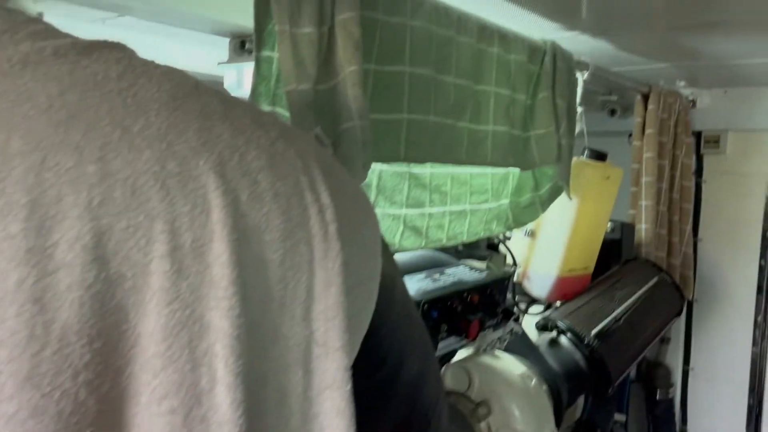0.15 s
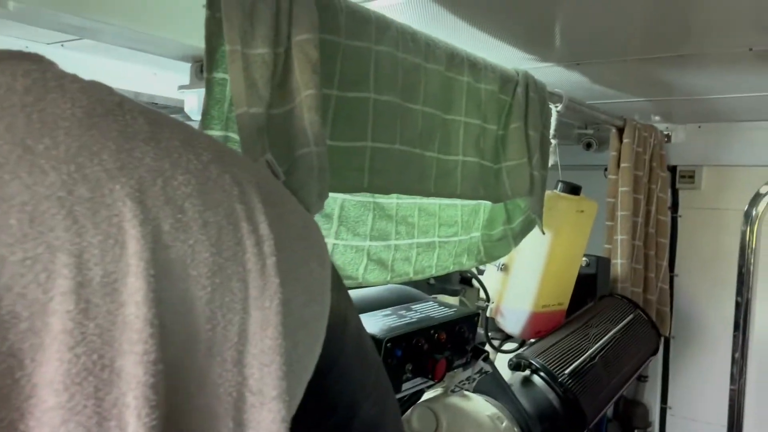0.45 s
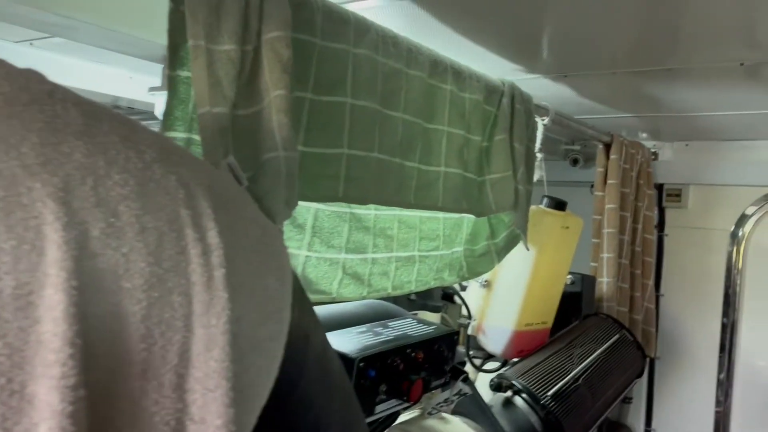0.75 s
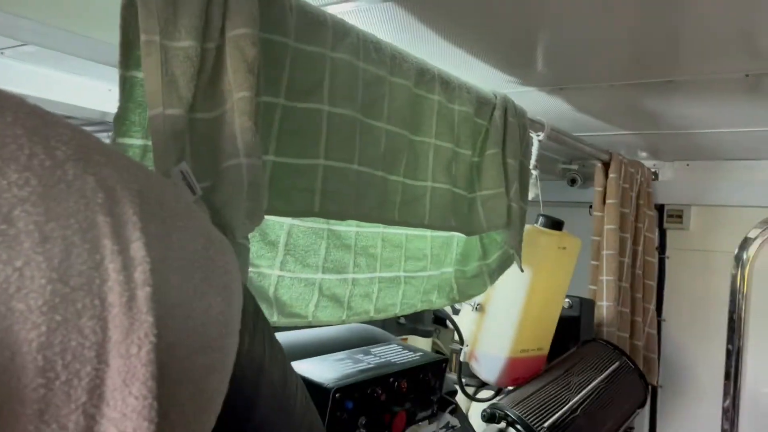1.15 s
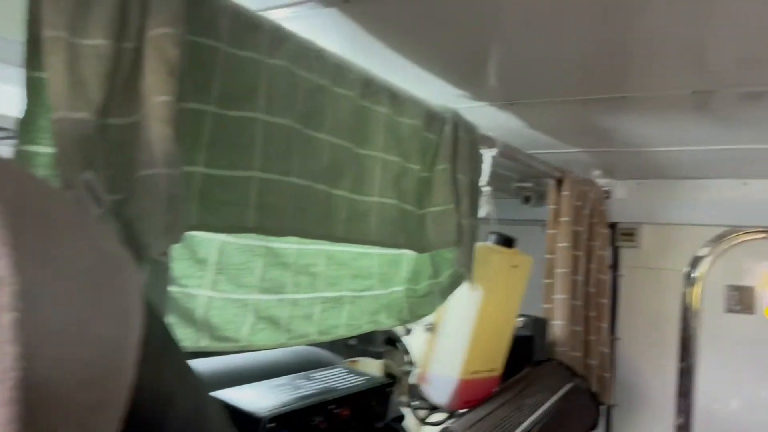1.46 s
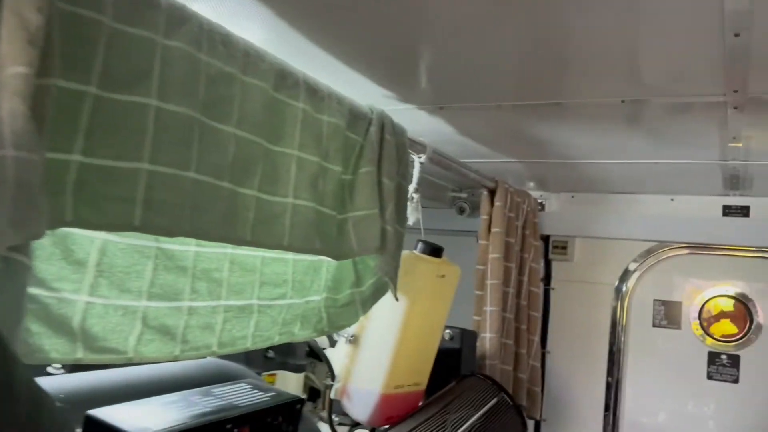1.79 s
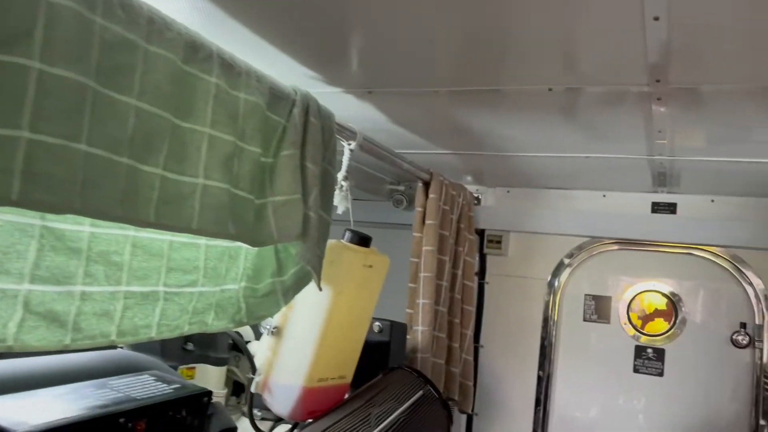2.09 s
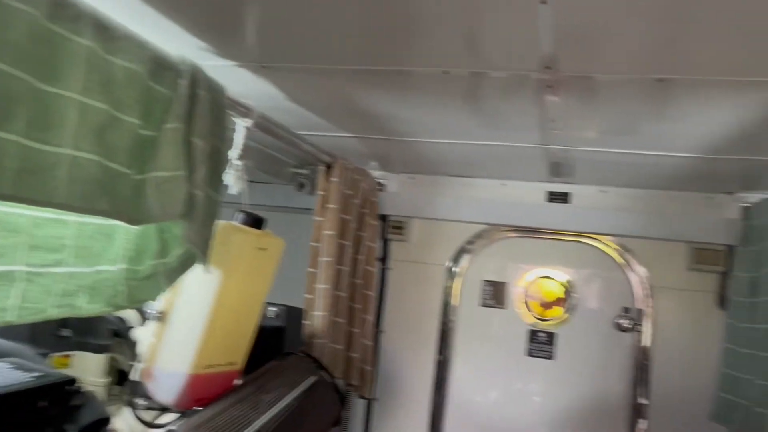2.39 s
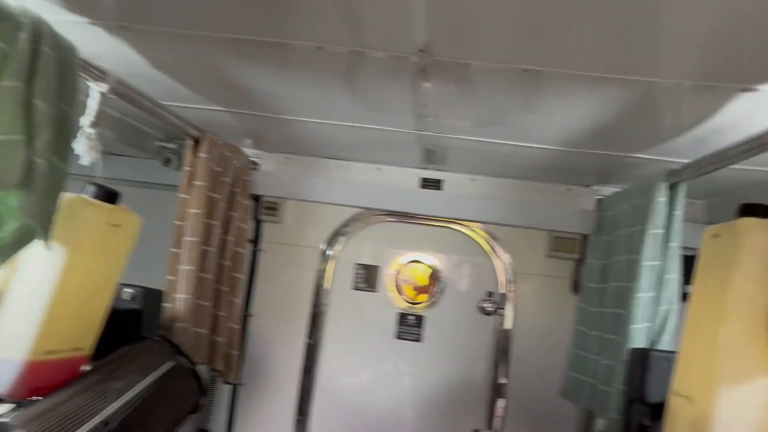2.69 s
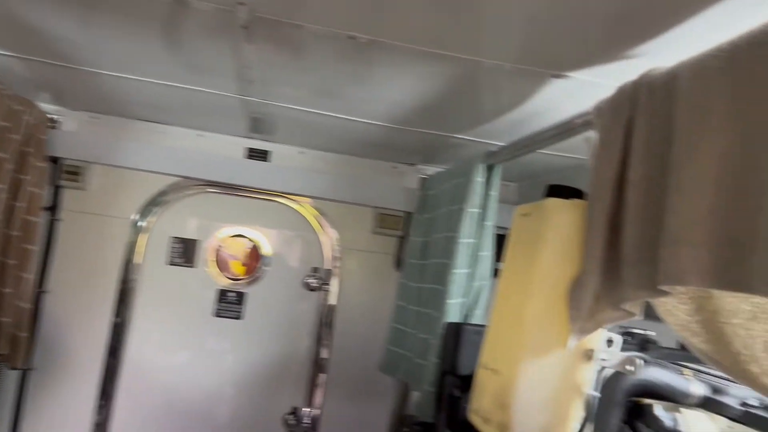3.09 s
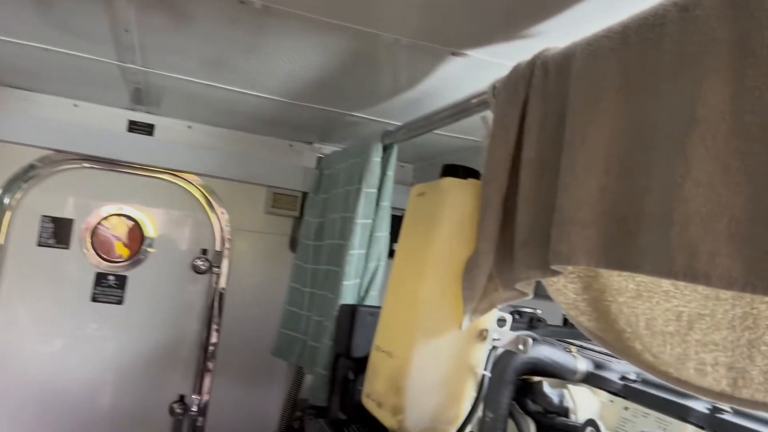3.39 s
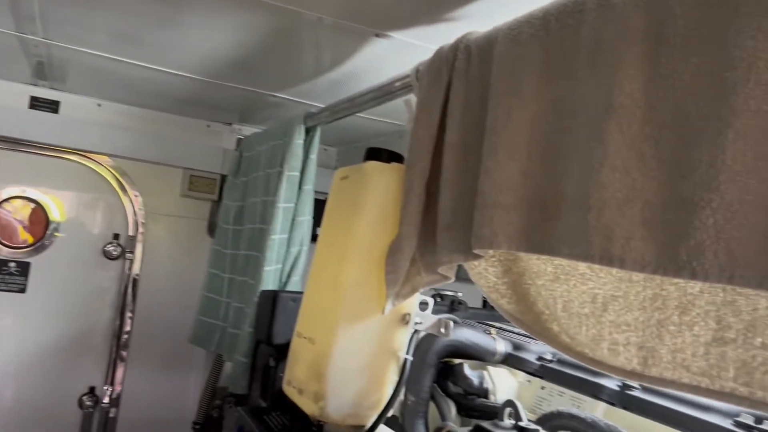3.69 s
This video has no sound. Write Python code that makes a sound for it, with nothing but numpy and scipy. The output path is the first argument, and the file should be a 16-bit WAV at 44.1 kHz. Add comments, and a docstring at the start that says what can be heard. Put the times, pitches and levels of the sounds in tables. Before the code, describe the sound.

A diesel engine drones with a loud, steady low hum inside a small metal cabin

```python
"""Diesel generator in a boat cabin

Inside a steel hull, two microphones turn with a handheld camera as it pans round from left to right.
A four-cylinder diesel drones: even firings and one stronger cylinder make a sum of engine orders.
Behind it lie low hull noise, a roar of partly repeating machinery noise and three cabin resonances.
Thin wavering tones lie on top: engine and gear tones below 2 kHz, electronic whines above.
A small pump ticks to the left as noise puffs in ringing metal, and once a soft bump shudders through
as two decaying low tones with two rough rubs."""
import sys
import numpy as np
from scipy import signal
from scipy.fft import rfft, irfft
from scipy.io import wavfile
from scipy.ndimage import uniform_filter1d

SR = 44100
rng = np.random.default_rng(int(sys.argv[2]) if len(sys.argv) > 2 else 0)


def to_wav(s):
    """Save 16-bit WAV."""
    ch = np.atleast_2d(s).T  # columns
    pcm = np.round(np.clip(ch, -1, 1) * 32767)  # PCM
    wavfile.write(sys.argv[1], SR, pcm.astype(np.int16))


N = 169785
CYCLE_HZ = 15.0252  # four-stroke cycles a second


def gain_of(db):
    """Turns dB into an amplitude gain."""
    return 10 ** (np.asarray(db) / 20)


def evened(x):
    """Scales to rms 1."""
    return x / np.sqrt(np.mean(x ** 2) + 1e-20)


def read(points, hz):
    """Reads a table over frequency, straight between points on a log-frequency axis."""
    f, value = np.transpose(list(points))
    return np.interp(np.log(hz + 1), np.log(f + 1), value)


def drift(per_s):
    """Slow random wandering of rms 1: twelve sines up to per_s Hz, the slower ones stronger."""
    t = np.arange(0, N + 441, 441) / SR
    slow = 0
    for f in np.geomspace(.1, 1, num=12):
        slow = slow + np.sin(2 * np.pi * (f * per_s * t + rng.random())) / np.sqrt(f)
    return np.interp(np.arange(N) / SR, t, evened(slow))


def ring(x, hz, width_hz):
    """A two-pole resonance of gain 1 at its peak."""
    return signal.lfilter(*signal.iirpeak(hz, hz / width_hz, SR), x)


# Low hull noise: f/Hz, level/dB per Hz
RUMBLE = [(20, -79), (35, -80), (55, -60), (85, -63), (120, -64), (200, -66.5), (260, -71.5), (330, -77),
          (420, -106), (600, -150)]


def rumble():
    """Low noise of the hull: shaped random noise, the same in both microphones."""
    hz = np.fft.rfftfreq(N, 1 / SR)
    shape = gain_of(read(RUMBLE, hz)) * np.sqrt(SR / 2)
    return irfft(rfft(rng.standard_normal(N)) * shape, N)


# Clatter repeating with the engine cycle: f/Hz, share that repeats (0-1, before the gain below),
# likeness of one cycle to the next (0-1)
REPEAT = [(350, .15, .9), (600, .4, .88), (850, .5, .83), (1200, .4, .75), (1700, .45, .65),
          (2400, .22, .6), (3300, .07, .6), (5000, 0., .6)]


def clatter(count, gain=1):
    """Noise of valves and pistons: part of it comes round again each cycle and changes slowly."""
    hz = np.fft.rfftfreq(N, 1 / SR)
    f, share, alike = np.transpose(REPEAT)
    share = np.clip(gain * read(zip(f, share), hz), 0, .95)
    alike = read(zip(f, alike), hz)
    # repeating gathers the noise's power at multiples of the cycle rate
    comb = (1 - alike ** 2) / (1 - 2 * alike * np.cos(2 * np.pi * hz / CYCLE_HZ) + alike ** 2)
    power = 1 - share + share * comb
    return irfft(rfft(rng.standard_normal((count, N))) * np.sqrt(power), N)


# Roar common to both microphones, early and late in the pan: f/Hz, level/dB re COMMON_REF_DB
COMMON_EARLY = [(180, -31), (300, 1), (428, -9.5), (495, -3), (536, -11), (600, 1), (651, -18), (717, 0),
                (765, -15.5), (816, -7), (959, -9.5), (1040, -12), (1440, -15.5), (1530, -17.5),
                (1800, -16.5), (2050, -18), (3720, -24), (4030, -23), (5570, -28.5), (6030, -28),
                (7560, -37), (8600, -77), (9330, -38), (12100, -37), (14200, -46.5)]
COMMON_LATE = [(180, -28), (300, 0), (330, -9.5), (370, -25.5), (388, -8), (408, -6.5), (471, -8.5),
               (563, -5.5), (591, -18.5), (729, -9.5), (856, -15), (974, -11), (1390, -17.5), (1660, -17.5),
               (1860, -19), (2570, -19.5), (3110, -24), (3600, -23.5), (5660, -31.5), (6130, -29.5),
               (7560, -41), (8470, -79), (9330, -40), (11900, -39), (14200, -48.5)]
# Roar opposite in the two microphones, early and late: f/Hz, level/dB re WIDE_REF_DB
WIDE_EARLY = [(88, -33), (150, -10), (228, -10), (256, -23), (298, -41), (389, -27), (498, -1.5), (650, -8),
              (816, -8), (1360, -15.5), (1590, -15.5), (1850, -16.5), (2040, -18), (5170, -30.5),
              (6020, -31.5), (9880, -35.5), (10900, -47), (11500, -80), (14200, -40.5)]
WIDE_LATE = [(88, -34), (150, 1), (188, 9.5), (207, -16), (232, 4), (266, -14), (303, -4), (327, -23),
             (404, -23), (470, -11.5), (662, -12), (915, -9), (1190, -16.5), (1450, -17), (5080, -31),
             (6020, -33), (10500, -38), (11500, -71.5), (14200, -43)]
# Stronger at the left microphone: f/Hz, lean to the left (-1..1)
LEAN = [(300, -0.092), (670, -0.27), (1230, -0.22), (2250, 0.33), (4110, 0.65), (7000, 0.38), (9000, 0.)]
# Earlier at the left microphone: f/Hz, how far left leads right (-1..1)
AHEAD = [(200, .3), (500, .6), (1200, .5), (2500, .4), (4300, .4), (5300, 0.), (6200, -.5), (7300, -.5),
         (9000, 0.)]
# Roar over time: t/s, mids level/dB, treble level/dB
ROAR_LEVELS = [(0, 0.5, 2., ), (.3, -0.5, 2.5), (.7, 0, 0.5), (1.2, -0.5, 0.5), (1.7, 0, 0),
               (2.2, 0.5, 0.5), (2.7, 1.5, 1), (3.199, 1, 1), (3.85, 0.5, 2)]
COMMON_REF_DB, WIDE_REF_DB = (-64.5, -65.5), (-64, -65.5)  # early, late
TURN_S = (0.88, 2.67)  # the colour changes between these moments
PATCH_DB = .9  # rms unevenness over time and frequency
THROB_DB, THROB_ORDER = .45, 6  # swing up and down, swings per engine cycle


def roar():
    """Machinery noise: patchy spectra, common and differing parts, throbbing slightly with the crank."""
    z = signal.stft(clatter(count=2), nperseg=1024, noverlap=768)[2]
    first, second = z / np.sqrt(2 * np.mean(abs(z) ** 2))
    frames, hz = z.shape[2], np.fft.rfftfreq(1024, 1 / SR)
    t = np.arange(frames) * 256 / SR

    patches = rng.standard_normal((frames, 513)).T
    patches = uniform_filter1d(patches, size=6, axis=0)  # across frequency
    patches = evened(uniform_filter1d(patches, size=40, axis=1))  # across time

    times, mids_db, treble_db = np.transpose(ROAR_LEVELS)
    treble = np.clip(np.log2(hz / 1500 + 1e-9) / 2, 0, 1)  # mids hand over from 1.5 to 6 kHz
    level = np.outer(1 - treble, np.interp(t, times, mids_db))
    level += np.outer(treble, np.interp(t, times, treble_db)) + PATCH_DB * patches

    late = np.clip((t - TURN_S[0]) / (TURN_S[1] - TURN_S[0]), 0, 1)

    def colour(start, end, ref_db):
        """Crossfades two spectra in dB as the camera turns."""
        return np.outer(read(start, hz) + ref_db[0], 1 - late) + np.outer(read(end, hz) + ref_db[1], late)

    common = first * gain_of(colour(COMMON_EARLY, COMMON_LATE, COMMON_REF_DB) + level)
    common = common * (hz > 320)[:, None]
    # the part of the wide noise tied to the common one sets the lean and lead between microphones
    tied = (read(LEAN, hz) + 1j * read(AHEAD, hz))[:, None]
    wide = tied * first + np.sqrt(1 - abs(tied) ** 2) * second
    wide = wide * gain_of(colour(WIDE_EARLY, WIDE_LATE, WIDE_REF_DB) + level)
    wide = wide * (hz > 140)[:, None]

    pair = np.array([common + wide, common - wide])
    noise = signal.istft(pair, nperseg=1024, noverlap=768)[1][:, :N] * np.sqrt(SR / 1024)
    cycles = CYCLE_HZ * np.arange(N) / SR
    return noise * gain_of(THROB_DB * np.cos(2 * np.pi * THROB_ORDER * cycles - 1.1))


# Swell of three cabin resonances as the camera turns: t/s, low level/dB, middle level/dB, high level/dB
BANDS = [(0, -50, -72, -68), (.1, -51, -72, -60), (.25, -46, -74, -50), (.4, -63.5, -70, -70),
         (.7, -60, -73, -69), (.95, -53, -73, -70), (1.4, -53, -69, -76), (1.6, -62, -58.5, -74),
         (1.9, -67, -67.5, -75), (2.3, -60, -59, -76), (2.8, -71, -57, -76), (3.1, -58, -60.5, -75),
         (3.85, -62, -63, -74)]
# The resonances, low to high: f/Hz, width/Hz of each of two passes
BAND_RINGS = [(955, 75), (1695, 55), (1755, 45)]
BAND_REPEAT_GAIN = 1.6  # the resonances are fed mostly by repeating strokes


def cabin():
    """Machinery noise ringing in three narrow resonances of the cabin."""
    t = np.arange(N) / SR
    times, *levels_db = np.transpose(BANDS)
    noise = clatter(count=3, gain=BAND_REPEAT_GAIN)
    near = noise[0] + .6 * noise[1:]  # shared part plus each microphone's own
    out = np.zeros((2, N))
    for (hz, width), db in zip(BAND_RINGS, levels_db):
        rung = ring(ring(near, hz, width), hz, width)
        out += gain_of(np.interp(t, times, db)) * evened(rung)
    return out


# Moments when the camera faces left, ahead, right (the engine uses them too): t/s
FACING_S = [0.31, 1.9, 3.26]
# Engine and gear tones below 2 kHz, electronic whines above: f/Hz
TONES_HZ = [500, 586.5, 902, 947, 1685, 1924, 3982, 4059, 4107, 4184, 4684, 4786, 5841, 5893, 5944, 5997,
            6050, 6099, 6153, 6256, 11683, 11892, 11994, 12204]
# One row per tone: rms level/dB facing left, ahead, right
TONES_DB = [(-58.5, -61.5, -61), (-58.5, -67, -70.5), (-65, -66, -60.5), (-58, -62, -64), (-72, -66, -65),
            (-68, -74, -74), (-74, -75.5, -79.5), (-72.5, -78, -80), (-70, -78, -72), (-75.5, -77.5, -73),
            (-73.5, -77, -80), (-69.5, -75.5, -75.5), (-78, -82, -80), (-79, -84, -80),
            (-70.5, -71.5, -71.5), (-70, -71.5, -71.5), (-78.5, -81.5, -80), (-78, -77, -75.5),
            (-77.5, -83, -80), (-67.5, -75, -76), (-88, -87, -87), (-87.5, -89.5, -88), (-80, -80, -81.5),
            (-86, -87.5, -87)]
TONE_WAVER_DB = 2.  # rms of each microphone's own wavering; half as much is shared
TONE_WIDTH_HZ = 2.  # rms pitch wandering from 4 kHz up, in proportion to pitch below


def thin_tones():
    """Engine and gear tones below 2 kHz and electronic whines above: thin wavering tones,
    swelling apart at each microphone; the highest arrive alike at both."""
    t, out = np.arange(N) / SR, np.zeros((2, N))
    for hz, facing_db in zip(TONES_HZ, TONES_DB):
        wander_hz = TONE_WIDTH_HZ * min(hz / 4000, 1) * drift(2.977)
        turns = hz * t + np.cumsum(wander_hz) / SR
        left, right, phase = (hz < 9000) * np.array([drift(2.6), drift(2.2), drift(1.42)])
        waver_db = TONE_WAVER_DB * (np.array([left, right]) + .5 * drift(1.7))
        level = gain_of(np.interp(t, FACING_S, facing_db) + waver_db)
        apart = 0.14 * np.outer([1, -1], phase)  # turns
        out += np.sqrt(2) * level * np.cos(2 * np.pi * (turns + apart))
    return out


# Ringing of the pump's metal housing: f/Hz, overall width/Hz, level/dB
TICK_RINGS = [(4184, 330, 0.5), (4400, 260, -4), (4750, 270, -2.5), (5370, 250, -7)]
TICK_HZ, TICK_START_S = 19.262, .039
TICK_DB, TICK_SPREAD_DB = -66, 1  # rms level before panning, rms unevenness
TICK_PAN_DB = 7.5  # left above right


def pump():
    """A regular tick of uneven strength: noise puffs ring a small metal housing to the left."""
    at = np.round(np.arange(TICK_START_S, N / SR - .01, 1 / TICK_HZ) * SR).astype(int)
    clicks = np.zeros(N)
    clicks[at] = gain_of(TICK_SPREAD_DB * rng.standard_normal(len(at)))
    decay = np.exp(-np.arange(800) / (0.015 * SR))
    puff = signal.oaconvolve(clicks, decay)[:N] * rng.standard_normal((2, N))
    near = puff + .5 * puff[::-1]  # each microphone also hears half the other's puff
    rung = np.zeros((2, N))
    for hz, width, db in TICK_RINGS:
        tone = near
        for _ in range(3):  # three broad passes narrow to the listed width
            tone = ring(tone, hz, 2 * width)
        rung += gain_of(db) * tone
    return gain_of(TICK_DB) * evened(rung) * gain_of([[TICK_PAN_DB / 2], [-TICK_PAN_DB / 2]])


# Hull shudder: f/Hz, level/dB
BUMP_MODES = [(69, -39), (88, -24)]
# Rough rubs around its onset: t/s, length/s, level/dB
RUBS = [(2.905, .048, -46.5), (2.968, .018, -48)]
# Colour of the rubs: f/Hz, width/Hz of each of two passes, level/dB re the rub
RUB_RINGS = [(1350, 180, 0.), (1580, 250, -6.), (2100, 800, -8.), (11800, 2500, -20.)]
BUMP_S, BUMP_RISE_S, BUMP_T60_S = 2.92, 0.061, 0.52  # onset, swell, time to die by 60 dB
RUB_EDGE_S = .004  # fade at either end of a rub
SLIPS_PER_S, SLIP_JITTER, SLIP_HISS = 168, .15, .04  # mean rate, share of the gap, hiss rms


def bump():
    """A soft low shudder of the hull swells and dies, with two short rubs of irregular slips at its onset."""
    t = np.arange(N) / SR
    since = np.maximum(t - BUMP_S, 0)
    fall = gain_of(-60 * np.maximum(since - BUMP_RISE_S, 0) / BUMP_T60_S)
    swell = np.minimum(since / BUMP_RISE_S, 1) * fall
    thud = swell * sum(gain_of(db) * np.sin(2 * np.pi * hz * since) for hz, db in BUMP_MODES)

    shape = np.zeros(N)
    for start, length, db in RUBS:
        to_edge = np.minimum(t - start, start + length - t)
        shape += gain_of(db) * np.clip(to_edge / RUB_EDGE_S, 0, 1)

    gaps = SR / SLIPS_PER_S * (1 + SLIP_JITTER * rng.uniform(-1, 1, N // 200))
    at = np.cumsum(gaps).astype(int)
    slips = np.zeros(N)
    slips[at[at < N]] = rng.uniform(0.59, 1, N // 200)[at < N]
    near = slips + SLIP_HISS * rng.standard_normal((2, N))
    rub = np.zeros((2, N))
    for hz, width, db in RUB_RINGS:
        rub += gain_of(db) * evened(ring(ring(near, hz, width), hz, width))
    return thud + shape * rub


# Firing hum: t/s, level/dB
HUM = [(0, -18), (.35, -17), (.7, -18.5), (1.1, -17.5), (1.5, -19.5), (1.9, -20.5), (2.1, -21), (2.4, -20),
       (2.75, -22), (2.95, -21.5), (3.3, -21.5), (3.55, -22), (3.85, -21.5)]
# Engine orders with the camera facing left, ahead, right: multiple of the cycle, level/dB re the hum
ORDERS_LEFT = [(1, -55), (2, -55.5), (3, -28), (4, 0.5), (5, -14.5), (6, -23.5), (7, -18), (8, -14),
               (9, -18.5), (10, -34), (11, -29), (12, -27.5), (13, -25), (14, -26.5), (15, -22.5),
               (16, -37), (17, -34), (18, -68), (19, -36), (20, -40), (21, -54), (22, -39), (23, -39),
               (24, -62), (25, -38), (26, -46.5), (27, -55.5), (28, -47.5), (29, -56.5), (30, -37.5),
               (31, -48), (32, -34), (33, -45.5), (34, -34)]
ORDERS_AHEAD = [(1, -56), (2, -39.5), (3, -33), (4, 0), (5, -11.5), (6, -21), (7, -17.5), (8, -17),
                (9, -17.5), (10, -18.5), (11, -23), (12, -33), (13, -36.5), (14, -27), (15, -16.5),
                (16, -26), (17, -37.5), (18, -63), (19, -37.5), (20, -21.5), (21, -62), (22, -41),
                (23, -41), (24, -68), (25, -58), (26, -34.5), (27, -33.5), (28, -36), (29, -49.5),
                (30, -49.5), (31, -54), (32, -41.5), (33, -38), (34, -43)]
ORDERS_RIGHT = [(1, -57), (2, -43), (3, -48), (4, 0.5), (5, -10), (6, -29), (7, -15.5), (8, -20), (9, -22),
                (10, -23), (11, -20), (12, -19.5), (13, -34), (14, -42), (15, -21.5), (16, -26.5),
                (17, -40.5), (18, -49), (19, -48), (20, -33.5), (21, -47), (22, -62), (23, -65),
                (24, -53.5), (25, -57), (26, -44.5), (27, -28), (28, -48), (29, -81.5), (30, -39),
                (31, -49), (32, -35), (33, -39.5), (34, -35)]
# Balance of the microphones: f/Hz, left above right level/dB
HUM_PAN = [(60, -0.9), (120, -3), (220, -1.5), (400, 0)]
# Phase between the microphones, either one leading by chance: f/Hz, lead/turns
HUM_WIDTH = [(60, 0.0085), (120, 0.034), (250, 0.068), (500, 0.27)]
CYLINDERS = 4
CYCLE_START = .0141  # crank position at time zero, cycles
EVEN_LEAD, EVEN_LAG = .4, .1  # even firings through the hull: turns, cycles
ODD_LEAD, ODD_LAG, ODD_SPREAD = .45, .05, .0375  # strong cylinder's kick, higher orders later
AIR_ORDER = 10  # from this order up kick and firings arrive through the air
AIR_LEAD, AIR_EVEN_LEAD = .22, .67  # turns
PATH_ORDER = 9  # from this order up the sound arrives earlier as the camera turns
PATH_LEAD = [-.06, 0., .06]  # turns, facing left, ahead, right
WAVER_DB, WAVER_TURNS, WAVER_PER_S = .03, .002, 1.5  # rms per order away from the firing order; rate


def engine():
    """Orders of the cycle: even firings plus one stronger cylinder, heard through the turning camera."""
    t, out = np.arange(N) / SR, np.zeros((2, N))
    crank = CYCLE_HZ * t + CYCLE_START
    hum_db = np.interp(t, *np.transpose(HUM))
    for (k, left), (_, ahead), (_, right) in zip(ORDERS_LEFT, ORDERS_AHEAD, ORDERS_RIGHT):
        hz = k * CYCLE_HZ
        through_air = k >= AIR_ORDER
        if k % CYLINDERS == 0:  # even firings
            lead = (AIR_EVEN_LEAD if through_air else EVEN_LEAD) - EVEN_LAG * k
        elif through_air:
            lead = AIR_LEAD
        else:
            past = k - CYLINDERS - 1
            lead = ODD_LEAD - ODD_LAG * past - ODD_SPREAD * past ** 2
        if k >= PATH_ORDER:
            lead = lead + np.interp(t, FACING_S, PATH_LEAD)

        loose = abs(k - CYLINDERS)  # wavering grows away from the firing order
        facing_db = np.interp(t, FACING_S, [left, ahead, right])
        level = gain_of(hum_db + facing_db + WAVER_DB * loose * drift(WAVER_PER_S))
        turns = k * crank + lead + WAVER_TURNS * loose * drift(WAVER_PER_S)
        apart = read(HUM_WIDTH, hz) * rng.choice([-.5, .5])
        pan_db = read(HUM_PAN, hz) / 2
        wave = np.cos(2 * np.pi * (turns + [[apart], [-apart]]))
        out += np.sqrt(2) * level * gain_of([[pan_db], [-pan_db]]) * wave
    return out


def scene():
    """All sources summed at the two microphones, left and right."""
    return rumble() + roar() + cabin() + thin_tones() + pump() + bump() + engine()


def record(dry):
    """Band limit: a steep low-pass at 15.5 kHz."""
    lowpass = signal.firwin(511, 15500, window=("kaiser", 9), fs=SR)
    return signal.oaconvolve(dry, lowpass[None], "same")


dry = scene()
out = record(dry)
to_wav(out)
```